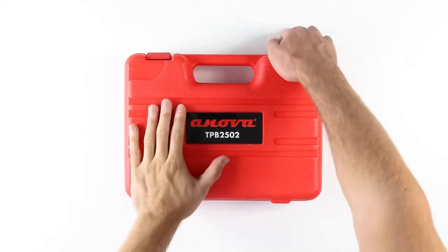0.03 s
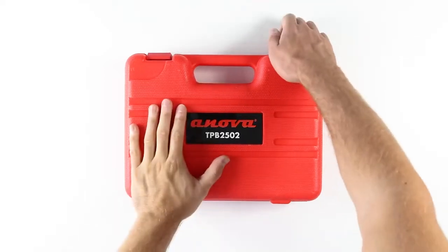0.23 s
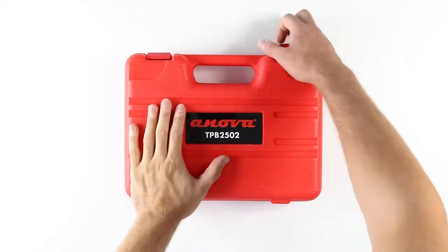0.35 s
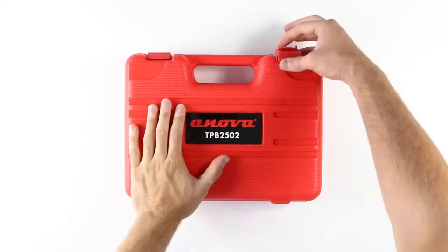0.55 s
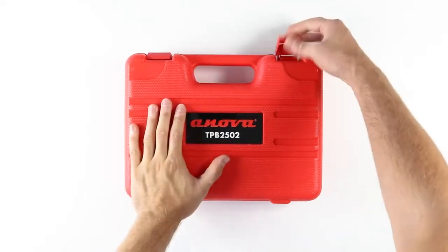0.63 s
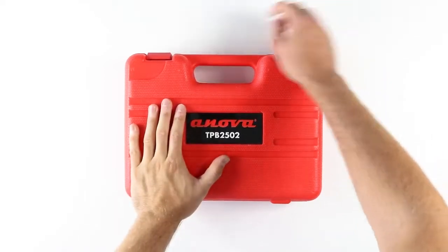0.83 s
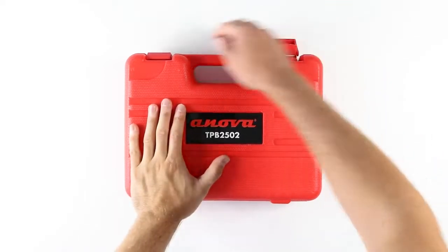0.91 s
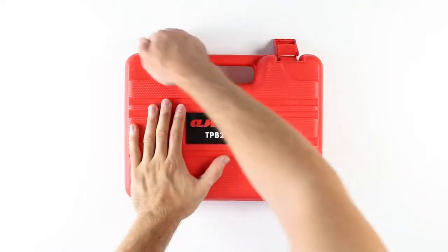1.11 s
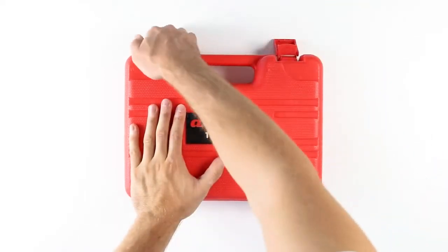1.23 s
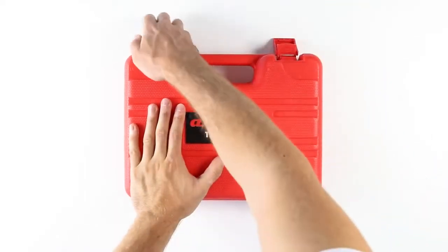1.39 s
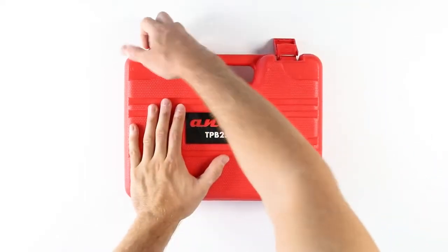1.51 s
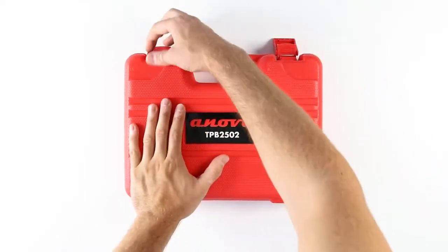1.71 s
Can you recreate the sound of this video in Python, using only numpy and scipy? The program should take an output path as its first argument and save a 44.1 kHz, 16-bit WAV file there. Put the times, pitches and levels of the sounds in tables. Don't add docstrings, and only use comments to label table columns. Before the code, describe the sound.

Two loud hollow snaps of plastic case latches popping open, loose flaps clacking, in a bare echoing room

```python
import sys
import numpy as np
from scipy import signal
from scipy.fft import rfft, irfft, next_fast_len
from scipy.io import wavfile
from scipy.ndimage import uniform_filter1d

SR = 44100
rng = np.random.default_rng(int(sys.argv[2]) if len(sys.argv) > 2 else 0)


def level_to_linear(level):
    exponent = np.asarray(level, float) / 20
    return 10 ** exponent


def wrap_up_sound(samples):
    columns = np.atleast_2d(samples).T
    tamed = np.clip(columns, -1, 1)
    steps = np.round(tamed * 32767).astype(np.int16)
    wavfile.write(sys.argv[1], SR, steps)


N = 77175

# (time [s], level [dB], low edge [Hz], top edge [Hz])
FIRST_CONTACTS = [(.187, -42, 550, 990), (.193, -43, 316, 1200), (.199, -48, 296, 1230),
                  (.207, -46, 199, 900), (.2135, -29, 205, 1510), (.2185, -33, 400, 1500),
                  (.2222, -13, 1500, 7000), (.2245, -11, 1170, 5000), (.2297, -1.5, 47.5, 1500),
                  (.2325, -29.5, 500, 3500), (.2362, -4, 49.6, 1210), (.240, -20, 480, 3960),
                  (.2437, -8, 400, 3520), (.247, -9, 60, 2000), (.252, -21.5, 600, 3970),
                  (.257, -12.5, 600, 2430), (.262, -43, 490, 2460), (.272, -13.5, 605, 3500),
                  (.2845, -15, 201, 2020), (.378, -29.5, 205, 2000)]
SECOND_CONTACTS = [(1.371, -55, 1520, 3020), (1.4025, -32.5, 992, 2470), (1.411, -26, 596, 2540),
                   (1.4165, -13, 590, 3000), (1.4188, -15.5, 1140, 3460), (1.422, -10.5, 875, 5000),
                   (1.426, -6.5, 1110, 5000), (1.4285, -10, 102, 2480), (1.4325, -6.5, 64, 1800),
                   (1.4362, -12.5, 93, 2610), (1.440, -24, 300, 3070), (1.4435, -14, 486, 6200),
                   (1.450, -20.5, 1214, 3950), (1.4635, -18.5, 494, 2600), (1.469, -17, 303, 2880),
                   (1.478, -32, 490, 2960), (1.5005, -35, 308, 3000), (1.527, -25.5, 201, 1200)]
# (frequency [Hz], width [Hz], level [dB])
FIRST_SHELL = [(490, 50, -1.5), (702, 210, -4), (950, 44, -3.5), (1110.4, 76, -5.5), (1244, 50, -5.5),
               (1364, 105, -8), (1635, 32, -1), (1920, 410, -13), (2600, 160, -11), (2750, 67, -5.5),
               (2995, 1540, -17.5), (4350, 80, -21.5), (7000, 6300, -30.5)]
SECOND_SHELL = [(590, 69, -11), (727, 152, -9.5), (870, 150, -8), (1027, 105, -3), (1150, 153, -5),
                (1280, 135, -6), (1505, 178, -11.5), (2140, 196, -11.5), (2540, 135, -10.5),
                (2900, 380, -17.5), (3500, 600, -17.5), (3940, 1050, -22.5), (8750, 6400, -31)]
# (time [s], level [dB])
FIRST_BLOWS = [
    (.2200, -30),
    (.2297, -5),
    (.2396, -11),
    (.2471, -13),
    (.272, -21),
    (.2835, -18),
]
SECOND_BLOWS = [
    (1.4173, -26),
    (1.4272, -9),
    (1.4321, -10),
    (1.4395, -16),
    (1.4685, -16),
    (1.527, -20),
]
# (frequency [Hz], width [Hz], level [dB])
FIRST_HOLLOW = [(268, 55, -4), (325, 50, 0), (402, 50, -2), (495, 60, -8)]
SECOND_HOLLOW = [(130, 50, -13), (190, 60, -10), (248, 60, -7), (305, 50, -5), (405, 55, 0), (485, 60, -3)]
# (frequency [Hz], width [Hz], level [dB])
TABLE_TOP = [(60, 31, 3), (126, 19, -9.5), (171.4, 69, -3)]

# (time [s], level [dB], left-right pan [dB])
TICK_KNOCKS = [
    (.5995, -20, -3),
    (.6009, -27.5, 2.5),
    (.6065, -33.5, -7),
]
CLACK_KNOCKS = [
    (.8474, -20.5, -1.9),
    (.8495, -10.5, -0.62),
    (.8512, -30, -1),
    (.8525, -28, -1.4),
    (.8575, -20, -1),
]
FLICK_KNOCKS = [
    (1.6617, -20, -3),
    (1.6631, -24, -3),
]
FLOP_KNOCKS = [
    (1.7262, -20, -2.9),
    (1.7278, -29, -0.98),
    (1.7335, -22.5, -2.2),
    (1.7360, -26.5, -2),
]
RIM_KNOCKS = [
    (.8478, -20.5, -2.5),
]
SNAP_KNOCKS = [
    (.84735, -6.5, -1),
    (.8499, -26, -1),
    (.8528, -27, -1),
]
# (frequency [Hz], width [Hz], level [dB])
TICK_MODES = [(542, 38, 10.5), (1000, 160, -4), (1418, 136, 7.5), (2270, 226, -2.5), (2970, 190, -5),
              (3800, 390, -15.5), (5770, 200, -15.5)]
CLACK_MODES = [(633, 120, -16.5), (1016, 270, -9), (1305, 127, 0.5), (2126, 100, 1.5), (2760, 1100, -7),
               (4020, 280, -7.5), (4070, 400, -18), (12600, 9200, -24.5)]
FLICK_MODES = [(780, 430, 5), (2020, 136, 10.5), (2990, 180, 11), (4300, 170, -25), (6040, 1700, -17.5)]
FLOP_MODES = [(734, 81, 2), (1350, 210, -2.5), (2310, 105, 0), (3130, 340, -10.5), (4000, 700, -13),
              (7540, 7000, -24.5)]
RIM_MODES = [(500, 165, -13), (670, 65, -1.5), (896, 42, -6)]
SNAP_MODES = [(6643, 645, 4.5), (6820, 700, 4), (7860, 1230, -4.5), (10400, 4500, -24.5)]

EVENT_WET_DB = [
    -4.5,
    -6.5,
    -2.5,
    -2,
    -6.5,
    -2.5,
    -3.5,
]
# (delay [s], level [dB])
EARLY_ECHOES = [
    (.0026, -20),
    (.0058, -24.5),
]
# (frequency [Hz], T60 [s])
TAIL_DECAY = [(60, 0.53), (250, 1.2), (700, 0.94), (2000, 1.23), (5000, 1.066), (9000, 0.95), (15000, 0.86)]
# (frequency [Hz], level [dB])
TAIL_TONE = [(50, 10.5), (150, 0.5), (400, 2), (1500, 1.5), (3500, 0), (7000, 6.5), (11000, 2),
             (15000, -2.5)]
# (frequency [Hz], correlation [-1 to 1])
LIKENESS = [(60, 1), (180, 0.96), (330, 0.94), (700, 0.71), (1650, -0.072), (4970, -0.081), (15000, 0.17)]
# (frequency [Hz], left minus right [dB])
DIRECT_SHADING = [(500, 5), (2200, -1), (5000, -2.5), (12000, 1)]
# (frequency [Hz], level [dB per Hz])
AIR_TONE = [(25, -5), (50, -7), (85, -9), (150, -3.5), (325, 5.5), (520, -0.5), (1000, -9), (2500, -19),
            (5000, -37.5), (16000, -74)]


def release(contacts, shell, blows, hollow, shell_db, hollow_db, pan_db, thump_db):
    chatter_db, chatter_t60_s = -3.5, 0.046
    panel_low_hz, hollow_low_hz, blow_top_hz = 400, 90, 900
    t = np.arange(2048) / SR
    force = np.zeros(N + 4096)
    for s, db, low_hz, top_hz in contacts:
        chatter = 0.24 * level_to_linear(chatter_db - 60 * t / chatter_t60_s) * rng.standard_normal(2048)
        push = np.eye(1, 2048)[0] + chatter
        band = lambda f: 1j * f / (low_hz + 1j * f) / (1 + 1j * f / top_hz)
        force[round(s * SR):][:2048] += level_to_linear(db) * filtered(push, band)
    deep = np.zeros(N)
    for s, db in blows:
        deep[round(s * SR)] = level_to_linear(db)

    panel_ring, panel_cut = body(shell), above(panel_low_hz)
    panels = level_to_linear(shell_db) * filtered(force[:N], lambda f: panel_ring(f) * panel_cut(f))

    hollow_ring, hollow_cut, table_ring = body(hollow, turn=0.97), above(hollow_low_hz), body(TABLE_TOP)

    def boom_response(f):
        case = level_to_linear(hollow_db) * hollow_ring(f) * hollow_cut(f)
        table = level_to_linear(thump_db) * table_ring(f)
        return (case + table) / (1 + 1j * f / blow_top_hz) ** 2

    boom = filtered(deep, boom_response)
    return (panels + boom) * level_to_linear([[pan_db / 2], [-pan_db / 2]])


def flap(knocks, modes, top_hz=5000):
    low_hz, chatter_db, chatter_t60_s = 419, -10, 0.011
    t = np.arange(512) / SR
    force = np.zeros((2, N + 512))
    for s, db, pan_db in knocks:
        chatter = level_to_linear(chatter_db - 60 * t / chatter_t60_s) * rng.standard_normal(512)
        push = np.eye(1, 512)[0] + chatter
        force[:, round(s * SR):][:, :512] += level_to_linear([[db + pan_db / 2], [db - pan_db / 2]]) * push
    ring, cut = body(modes), above(low_hz)
    return filtered(force[:, :N], lambda f: ring(f) * cut(f) / (1 + 1j * f / top_hz))


def room(x, wet_db):
    direct = direct_sound(x)
    early = early_answer(wet_db)
    tail = late_tail(x, wet_db)
    return direct + signal.fftconvolve(x.mean(0)[None], early, axes=1)[:, :N] + tail


def direct_sound(x):
    lag_s = 0.00002
    sides = np.array([[1], [-1]])

    def ports(f):
        shading = level_to_linear(sides * along(DIRECT_SHADING, f) / 2)
        return shading * np.exp(-1j * np.pi * f * lag_s * sides)

    return filtered(x, ports)


def early_answer(wet_db):
    low_hz, scatter_db, scatter_t60_s = 500, -3, 0.075
    t = np.arange(N) / SR
    scatter = filtered(pair(N), above(low_hz)) * level_to_linear(-60 * t / scatter_t60_s) * (t > .001)
    answer = level_to_linear(wet_db + scatter_db) * scatter / np.linalg.norm(scatter[0])
    for s, db in EARLY_ECHOES:
        arrival = round(s * SR) + rng.integers(12, size=2)
        answer[[0, 1], arrival] += level_to_linear(db)
    return answer


def late_tail(x, wet_db):
    rise_s = 0.0046
    hz, t, z = signal.stft(pair(N), SR, nperseg=256)
    decay_db = along(TAIL_TONE, hz)[:, None] - 60 * t / along(TAIL_DECAY, hz)[:, None]
    tail = signal.istft(z * level_to_linear(decay_db), SR, nperseg=256)[1][:, :N]
    colour = blurred(x.mean(0))
    tail = filtered(tail / np.linalg.norm(tail[0]), lambda f: along(colour, f))
    tail = tail * (1 - np.exp(-np.arange(N) / SR / rise_s))
    loudest = np.abs(x).sum(0).argmax()
    return level_to_linear(wet_db) * np.pad(tail, [(0, 0), (loudest, 0)])[:, :N]


def air():
    hum_db, hiss_db = -58.5, -77.5
    hum = filtered(pair(N), lambda f: level_to_linear(along(AIR_TONE, f)))
    return level_to_linear(hum_db) * hum / hum.std() + level_to_linear(hiss_db) * rng.standard_normal((2, N))


def pair(length):
    def mid_side(f):
        angle = np.arccos(np.clip(along(LIKENESS, f), -1, 1)) / 2
        return np.array([np.cos(angle), np.sin(angle)])

    mid, side = filtered(rng.standard_normal((2, length)), mid_side)
    return np.array([mid + side, mid - side])


def body(peaks, turn=-1):
    def shape(f):
        total = 0
        for k, (centre, width, db) in enumerate(peaks):
            damping = 1j * f * width
            total = total + turn ** k * level_to_linear(db) * damping / (centre * centre - f * f + damping)
        return total

    top = np.abs(filtered(np.eye(1, 4096)[0], shape)).max()
    return lambda f: shape(f) / top


def blurred(x):
    blur_octaves = 0.23
    hz = np.geomspace(20, SR / 2, num=2000)
    power = uniform_filter1d(np.abs(rfft(x)) ** 2, size=15)
    power = np.interp(hz, np.fft.rfftfreq(len(x), 1 / SR), power)
    steps = np.arange(-150, 151) / 200
    bell = np.exp(-2 * (steps / blur_octaves) ** 2)
    smooth = np.convolve(power, bell / bell.sum(), "same")
    return np.transpose([hz, np.sqrt(np.abs(smooth))])


def above(low_hz):
    return lambda f: (1j * f / (low_hz + 1j * f)) ** 2


def along(points, hz):
    f, v = np.transpose(points)
    return np.interp(np.log(hz + 1), np.log(f + 1), v)


def filtered(x, response):
    m = next_fast_len(x.shape[-1] + SR // 2)
    spectrum = rfft(x, m) * response(np.fft.rfftfreq(m, 1 / SR))
    return irfft(spectrum, m)[..., :x.shape[-1]]


def scene():
    events = [
        release(FIRST_CONTACTS, FIRST_SHELL, FIRST_BLOWS, FIRST_HOLLOW,
                shell_db=-4.5, hollow_db=6, pan_db=-3, thump_db=-11),
        release(SECOND_CONTACTS, SECOND_SHELL, SECOND_BLOWS, SECOND_HOLLOW,
                shell_db=-4, hollow_db=8, pan_db=-3.5, thump_db=-11),
        flap(TICK_KNOCKS, TICK_MODES),
        flap(CLACK_KNOCKS, CLACK_MODES),
        flap(FLICK_KNOCKS, FLICK_MODES),
        flap(FLOP_KNOCKS, FLOP_MODES),
        flap(RIM_KNOCKS, RIM_MODES, top_hz=1500),
    ]
    mix = sum(room(x, wet_db) for x, wet_db in zip(events, EVENT_WET_DB))
    snap = flap(SNAP_KNOCKS, SNAP_MODES, top_hz=7000)
    return mix + room(snap, wet_db=-16) + air()


def roll_off(x):
    return signal.sosfilt(signal.butter(12, 16290, fs=SR, output="sos"), x)


def record(dry):
    top_hz, edge_hz = 16200, 16150
    mix = filtered(dry, lambda f: (f < edge_hz) / (1 + 1j * f / top_hz - (f / top_hz) ** 2))
    return roll_off(mix)


dry = scene()
out = record(dry)
wrap_up_sound(out)
```